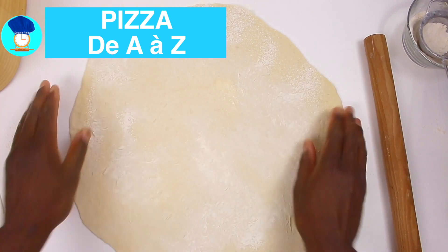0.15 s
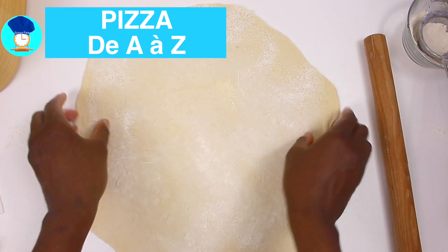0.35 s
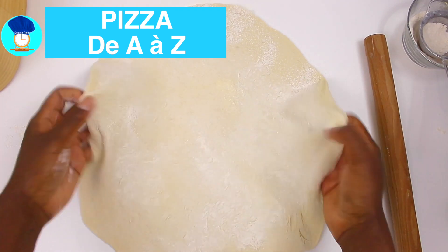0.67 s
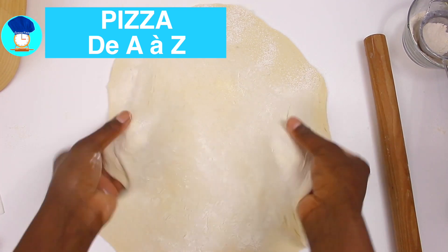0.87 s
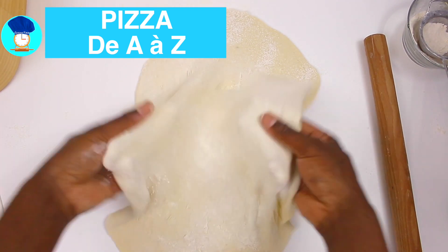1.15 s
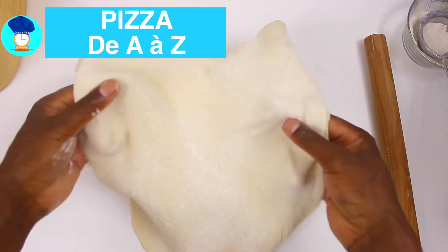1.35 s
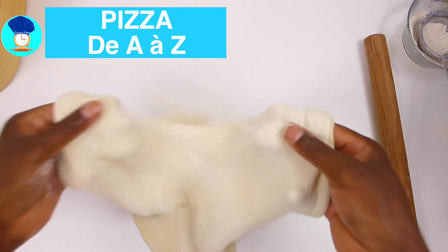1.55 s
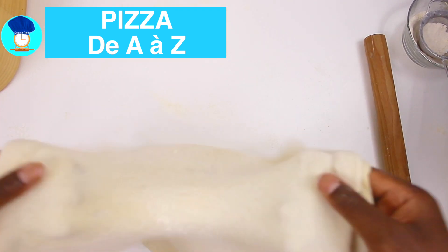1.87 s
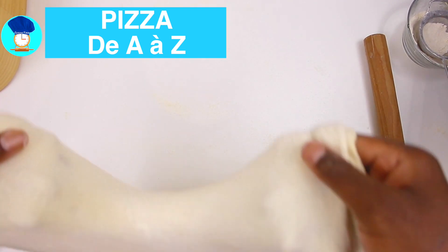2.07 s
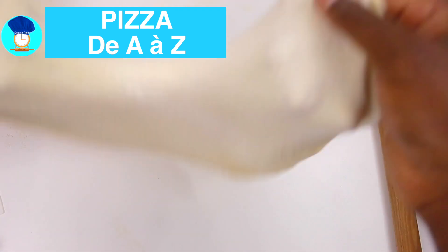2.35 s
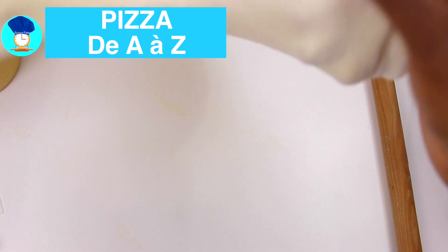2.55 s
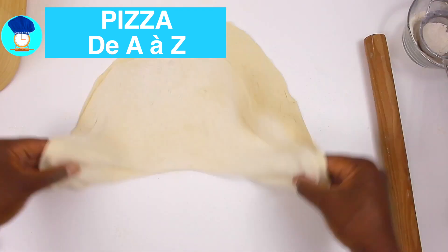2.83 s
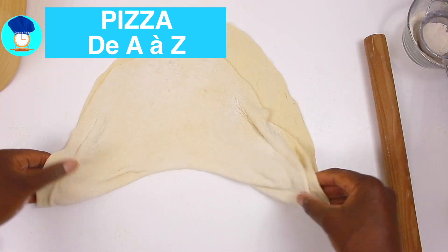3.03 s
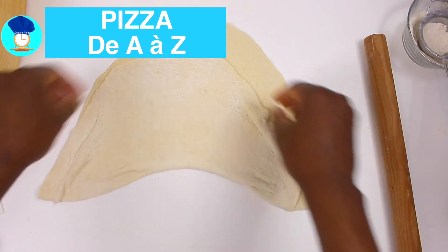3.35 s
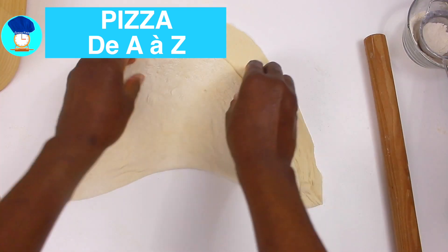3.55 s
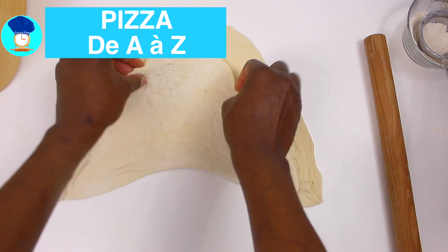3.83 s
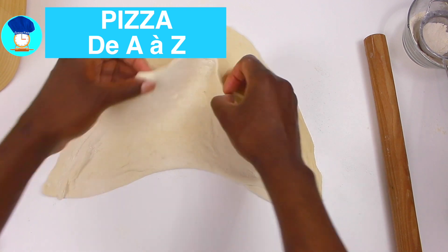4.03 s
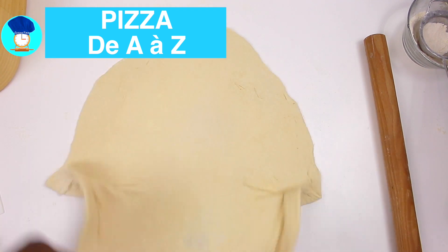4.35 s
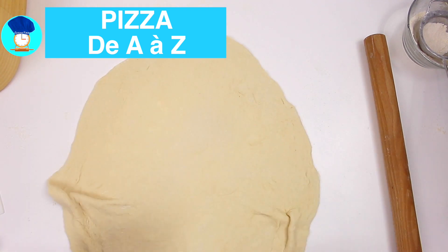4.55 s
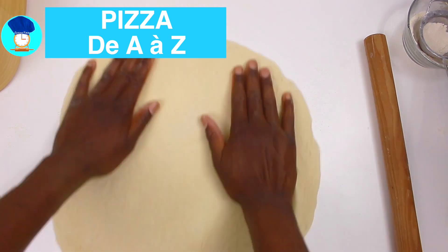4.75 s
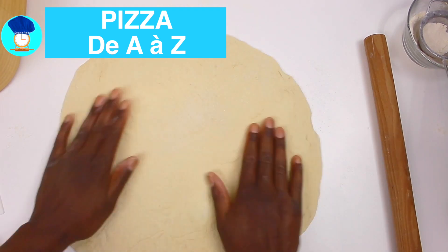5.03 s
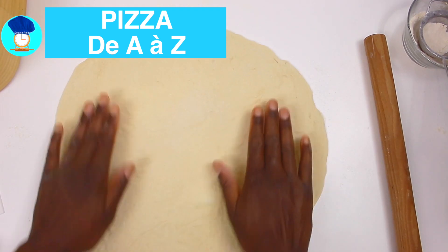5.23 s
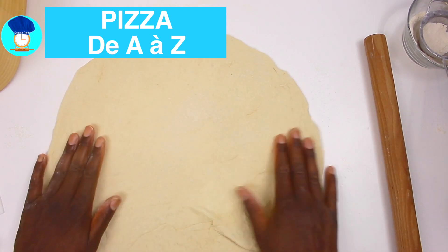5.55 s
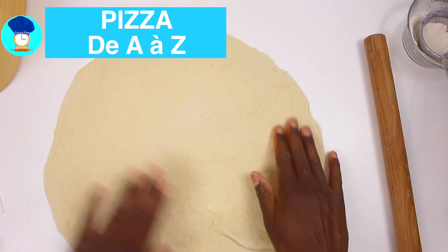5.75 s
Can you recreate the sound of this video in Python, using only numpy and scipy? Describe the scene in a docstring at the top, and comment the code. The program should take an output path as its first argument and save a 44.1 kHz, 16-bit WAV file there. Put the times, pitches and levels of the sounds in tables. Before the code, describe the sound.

Hands rustle and flop soft dough on a resonant worktop: dry flour hisses, one sharp slap midway, then dull palm pats.

```python
"""Hollow kitchen counter in a small hard room: a floured dough sheet is lifted, flopped down and patted.
Flour hiss and dough rustle are noise gated stroke by stroke, with ticks where dough sticks to skin.
Slaps are noise puffs through the worktop's modes; thumps and slow swells sound its low modes as sines.
Sticky pops and one small clink are short tones; a noise-tail echo and room tone surround them."""
import sys
import numpy as np
from scipy import signal
from scipy.fft import rfft, irfft, next_fast_len
from scipy.io import wavfile
from scipy.ndimage import map_coordinates

SR = 44100
rng = np.random.default_rng(int(sys.argv[2]) if len(sys.argv) > 2 else 0)


def wav_record(signal):
    """Record a signal, one row per channel, as 16-bit PCM in the file named by sys.argv[1]."""
    frames = np.transpose(np.atleast_2d(signal))
    bounded = np.clip(frames, -1, 1)
    # unit amplitude maps onto the largest positive 16-bit level
    quanta = np.round(bounded * 32767).astype(np.int16)
    wavfile.write(sys.argv[1], SR, quanta)


N = 259749


def amp(db):
    """Gain of a level in dB."""
    return 10 ** (np.asarray(db) / 20)


def unit(x):
    """Scaled to rms 1."""
    return x / np.sqrt(np.mean(x ** 2) + 1e-20)


def along(points, hz):
    """(frequency [Hz], value) points interpolated on a log axis."""
    f, v = np.transpose(points)
    return np.interp(np.log(hz + 1), np.log(f + 1), v)


def curves(rows):
    """One value per sample for each column after the time."""
    s, *cols = np.transpose(rows)
    return [np.interp(np.arange(N) / SR, s, c) for c in cols]


def wobble(rate_hz):
    """Smooth random curve, rate_hz knots a second."""
    knots = rng.standard_normal(int(N * rate_hz / SR) + 4)
    return map_coordinates(knots, [np.arange(N) * rate_hz / SR])


def filtered(x, response):
    """x through a complex response of frequency."""
    m = next_fast_len(x.shape[-1] + SR // 2)
    spectrum = rfft(x, m) * response(np.fft.rfftfreq(m, 1 / SR))
    return irfft(spectrum, m)[..., :x.shape[-1]]


def resonance(centre_hz, width_hz):
    """Causal band-pass response."""
    return lambda f: 1j * f * width_hz / (centre_hz ** 2 - f * f + 1j * f * width_hz)


def add(track, s, sound):
    """Mixes a sound in at time s."""
    part = track[round(s * SR):][:len(sound)]
    part += sound[:len(part)]


def paired(pair, alike, colour=lambda hz: 1):
    """Two unrelated signals mixed into a left and right of the given likeness."""
    def weights(hz):
        turn = np.arccos(np.clip(along(alike, hz), -1, 1)) / 2
        return colour(hz) * np.array([np.cos(turn), np.sin(turn)])
    mid, side = filtered(pair, weights)
    return np.array([mid + side, mid - side])


def rush(spectrum, alike, grain_db, grain_rate_hz, body=lambda hz: 1):
    """Coloured stereo noise of rms 1 with a randomly flickering level."""
    pair = rng.standard_normal((2, N)) * amp(grain_db * wobble(grain_rate_hz))
    return unit(paired(pair, alike, lambda hz: body(hz) * amp(along(spectrum, hz))))


def swell(s, rise_s, hold_s, sag_db_per_s, fade_db_per_s):
    """Gain that climbs 20 dB in the rise, sags through the hold, then fades."""
    t = np.arange(N) / SR - s
    climb_db = 20 * np.minimum(t, 0) / rise_s
    sag_db = sag_db_per_s * np.clip(t, 0, hold_s)
    fade_db = fade_db_per_s * np.maximum(t - hold_s, 0)
    return amp(climb_db - sag_db - fade_db)


# room tone spectrum: (frequency [Hz], relative level [dB])
AIR_SPECTRUM = [(13, -34), (22, -34), (59, -3), (115, -0.5), (160, -1), (236, -6), (286, -6.5), (387, -8.5),
                (496, -11), (792, -5), (935, -10), (1540, -17), (9480, -26), (14300, -31.5), (16000, -48)]
# room tone: (frequency [Hz], left-right correlation [-1..1])
AIR_LIKENESS = [(60, 1), (240, 0.29), (950, 0.095), (3770, 0.01), (15000, 0.036)]
AIR_DB = -51


def room_tone():
    """Air and microphone hiss: nearly steady coloured noise."""
    return amp(AIR_DB) * rush(AIR_SPECTRUM, AIR_LIKENESS, grain_db=0.14, grain_rate_hz=3.97)


# upper worktop modes: (frequency [Hz], width [Hz], level [dB])
WORKTOP_MODES = [(583, 59, 7.5), (653.5, 17, 7), (823, 54, 4.5), (957, 50, -3), (1217, 73, -6.5),
                 (1295, 29, 4.5), (1705, 25, -7), (2022, 70, -23.5), (2900, 1000, -1.5), (3650, 1700, -10)]


def worktop(f):
    """Response of the upper modes over a flat bed of unresolved ones."""
    return 1.7 + sum(amp(db) * resonance(hz, width_hz)(f) for hz, width_hz, db in WORKTOP_MODES)


def stickiness(per_second, spread_db, decay_cycles):
    """Bonds between dough and skin let go at random: damped ticks of scattered pitch and size."""
    draws = rng.random((int(per_second * N / SR), 3))
    hz = 500 * 7 ** draws[:, 1:2]
    t = np.arange(SR // 100) / SR
    tick_gain = amp(-spread_db * draws[:, 2:]) * np.exp(-hz * t / decay_cycles)
    ticks = tick_gain * np.sin(2 * np.pi * hz * t)
    where = (draws[:, :1] * N).astype(int) + np.arange(len(t))
    return unit(np.bincount(where.ravel(), ticks.ravel(), minlength=N)[:N])


# flour hiss spectrum: (frequency [Hz], relative level [dB])
FLOUR_SPECTRUM = [(350, -76), (600, -54), (652, -76), (812, -57), (1100, -9), (1490, -5.5), (2400, -6),
                  (3680, -7), (8740, -15), (16000, -28)]
# dough rustle spectrum before the worktop: (frequency [Hz], relative level [dB])
DOUGH_SPECTRUM = [(200, 1.5), (400, 4), (600, 0), (800, 3.5), (1300, 4), (2000, -2.5), (3500, -17),
                  (8000, -31)]
# sounds at the counter: (frequency [Hz], left-right correlation [-1..1])
NEAR_LIKENESS = [(60, .97), (500, 0.94), (1500, 0.76), (4000, 0.48), (12000, 0.15)]
# hand and dough strokes over flour:
# (loudest time [s], rise [s], slide [s], flour hiss level [dB], dough rustle level [dB])
STROKES = [(.05, 0.9, 0.015, -26, -42), (0.408, 0.062, .02, -44, -35), (0.569, 0.15, 0.017, -44.5, -38),
           (.72, 0.25, 0.0092, -46.5, -50.5), (.82, 0.13, 0.14, -49.5, -42),
           (0.969, 0.047, 0.019, -58, -35.5), (1.109, 0.21, 0.0073, -51, -36.5),
           (1.18, 0.077, 0.13, -49.5, -41), (1.35, .15, .06, -44.5, -51), (1.5, 0.025, 0.045, -46, -42.5),
           (1.6, 0.22, 0.064, -45, -47.5), (1.72, 0.12, .03, -40.5, -48.5), (1.93, 0.081, 0.045, -44, -48),
           (2.57, .04, 0.045, -55, -65), (2.75, 0.21, 0.098, -51, -56), (2.87, 0.04, .02, -40, -47),
           (2.916, 0.045, 0.055, -25.5, -20.5), (3.2, .1, .05, -54, -63), (3.46, 0.11, 0.046, -61, -54),
           (3.7, 0.086, 0.018, -53, -56), (3.87, 0.055, 0.017, -57, -64), (4.18, 0.21, 0.0081, -52.5, -57),
           (4.35, 0.11, 0.056, -69, -51), (4.5, 0.13, 0.048, -46.5, -65), (4.573, .08, 0.028, -43.5, -32.5),
           (4.833, 0.012, 0.15, -38, -49), (5.17, 0.045, 0.19, -40, -37.5), (5.424, 0.024, 0.021, -44, -36),
           (5.539, 0.078, 0.0043, -51.5, -45), (5.62, .06, 0.009, -49, -60),
           (5.68, 0.075, 0.0063, -52, -50), (5.88, 0.084, 0.018, -52.5, -56)]
# dough stirring between strokes: (time [s], flour hiss level [dB], dough rustle level [dB])
STIRRING = [(0, -69, -65), (.6, -52.5, -54.5), (1.85, -54.5, -52.5), (2.1, -58, -54.5), (2.25, -79, -61),
            (2.9, -66, -63.5), (3.0, -48, -31.5), (3.13, -48, -55), (3.33, -55.5, -53.5), (3.42, -71, -52),
            (3.8, -65, -60), (4.3, -67, -61.5), (5.1, -73, -57.5), (5.3, -56, -55), (5.89, -71, -57.5)]
SLIDE_SAG_DB_PER_S, HISS_FADE_DB_PER_S, RUSTLE_FADE_DB_PER_S = 79.5, 176, 174


def strokes():
    """Flour hisses under the skin; dough rustles lower and lumpier through the worktop, and ticks."""
    hiss_gain, rustle_gain = amp(curves(STIRRING))
    for s, rise_s, slide_s, hiss_db, rustle_db in STROKES:
        hiss_swell = swell(s, rise_s, slide_s, SLIDE_SAG_DB_PER_S, HISS_FADE_DB_PER_S)
        rustle_swell = swell(s, rise_s, slide_s, SLIDE_SAG_DB_PER_S, RUSTLE_FADE_DB_PER_S)
        hiss_gain = np.hypot(hiss_gain, amp(hiss_db) * hiss_swell)
        rustle_gain = np.hypot(rustle_gain, amp(rustle_db) * rustle_swell)
    hiss = rush(FLOUR_SPECTRUM, NEAR_LIKENESS, grain_db=0.5, grain_rate_hz=1600)
    rustle = rush(DOUGH_SPECTRUM, NEAR_LIKENESS, grain_db=1.5, grain_rate_hz=150, body=worktop)
    ticks = amp(-14) * stickiness(150, spread_db=17, decay_cycles=1.16)
    return hiss_gain * hiss + rustle_gain * (rustle + ticks)


def drone(hz, drift_hz, flutter_db):
    """One mode kept sounding by uneven pressure: a sine wandering in pitch and level, rms 1."""
    phase = 2 * np.pi * np.cumsum(hz + drift_hz * wobble(14)) / SR
    return unit(amp(flutter_db * wobble(25)) * np.sin(phase))


# lowest counter modes, sounding throughout: (frequency [Hz], level [dB])
MURMUR = [(52, -68.5), (112, -62.5)]
# low counter notes as weight shifts, without a blow:
# (loudest time [s], rise [s], hold [s], level [dB], mode frequency [Hz])
SWELLS = [(0.54, 0.11, 0.006, -47, 293.7), (0.873, 0.1, 0.044, -36.5, 287.3),
          (0.96, 0.21, 0.14, -41.5, 113.8), (1.373, 0.16, 0.015, -54, 112.7), (1.545, .1, 0.014, -51, 290),
          (1.732, 0.039, 0.022, -53, 295), (2.15, 0.75, 0.26, -50, 111.9),
          (2.941, 0.074, 0.015, -32.5, 290.7), (2.965, 0.16, 0.13, -44, 111.6),
          (3.07, 0.31, 0.28, -61, 51.7), (3.33, .3, .03, -53.5, 115), (3.597, 0.37, 0.15, -52, 52),
          (4.367, 0.075, .01, -47, 293), (4.57, 0.17, 0.027, -44, 110), (4.59, .1, .01, -43.5, 53.5),
          (4.662, .06, 0.019, -46, 288.7), (5.2, .1, 0.11, -49, 52), (5.255, .06, 0.1, -45, 291),
          (5.427, .1, 0.082, -47, 51.6), (5.512, .06, 0.031, -37.5, 288.8), (5.68, .1, .02, -44, 113.4),
          (5.68, .1, .02, -50, 52)]
SWELL_SAG_DB_PER_S, SWELL_FADE_DB_PER_S = 11, 150


def swells():
    """Uneven pressure keeps single low modes sounding."""
    out = sum(amp(db) * drone(hz, 4, 3.6) for hz, db in MURMUR)
    for s, rise_s, hold_s, db, hz in SWELLS:
        gain = amp(db) * swell(s, rise_s, hold_s, SWELL_SAG_DB_PER_S, SWELL_FADE_DB_PER_S)
        out = out + gain * drone(hz, 4, 2.2)
    return out


# dough slaps and finger taps:
# (time [s], puff peak [dB], centre frequency [Hz], t60 [s], crack drive re slap level [dB])
SLAPS = [(0.37, -34, 1000, 0.14, -19), (0.801, -32, 900, 0.052, -23), (0.861, -22, 570, 0.17, -33),
         (0.9443, -10, 1550, 0.031, -21), (0.947, -18, 820, 0.037, -40), (1.088, -31, 1920, 0.14, -34.5),
         (1.218, -27.5, 1960, 0.015, -30), (1.325, -34.5, 550, .1, -30), (1.49, -41, 554, 0.013, -17),
         (1.517, -32, 544, 0.0079, -25), (1.538, -24, 1240, 0.032, -10), (1.566, -23, 1450, 0.025, -30),
         (1.541, -32, 540, 0.05, -30), (1.577, -30, 580, 0.038, -3), (1.731, -17.5, 1620, 0.017, -5),
         (1.8, -34, 670, 0.029, -25), (1.891, -33.5, 1520, 0.044, -25), (1.938, -25, 1180, 0.038, -5.5),
         (2.855, -24, 760, 0.075, -20), (2.897, -16.5, 794, 0.044, -22), (2.93, -7, 2570, 0.056, -3),
         (2.9339, -3.5, 1820, 0.037, -0.5), (2.938, -6.5, 816, 0.08, -30), (2.956, -10, 950, 0.028, -25),
         (2.993, -15.5, 870, 0.038, -25), (4.171, -36, 2655, 0.04, -20), (4.317, -47, 1230, 0.097, -24),
         (4.334, -37.5, 820, 0.19, -30), (4.53, -32, 1050, .04, -27), (4.54, -18.5, 1220, 0.046, -9),
         (4.548, -12.5, 1200, 0.05, -16), (4.828, -31, 1720, 0.044, -20), (5.151, -22, 1240, 0.047, -9.5),
         (5.409, -23.5, 1350, 0.054, -10), (5.526, -29.5, 1840, 0.043, 0), (5.598, -35, 1000, 0.08, -26),
         (5.661, -29.5, 1150, 0.025, -21), (5.731, -39, 794, 0.084, -17), (5.859, -40, 1040, 0.056, -30)]
# band width over centre of a -25.5 dB slap; harder slaps are narrower, dB of width per dB of level
SLAP_WIDTH_RATIO, NARROWER_DB_PER_DB = 0.79, 0.2052


def slaps():
    """Air squeezed out under the dough rings the worktop around one band, with a bright crack."""
    out, t = np.zeros(N), np.arange(SR // 4) / SR
    for s, db, hz, t60, crack_db in SLAPS:
        noise = rng.standard_normal((2, len(t)))
        noise *= 1 - np.exp(-t / (0.032 * t60))  # longer slaps build up more slowly
        noise[0, 0] = 0.3 / t60  # shorter ones start with a stronger single push
        noise *= amp(-60 * t / t60)
        width_hz = SLAP_WIDTH_RATIO * amp(-NARROWER_DB_PER_DB * (db + 25.5)) * hz
        band = resonance(hz, width_hz)
        puff = filtered(noise[0], lambda f: worktop(f) * band(f) ** 2)
        crack = amp(crack_db) * filtered(noise[1], resonance(5300, 2260))
        add(out, s, amp(db) * (puff / np.abs(puff).max() + crack))
    return out


# low counter modes: (frequency [Hz], level [dB], free t60 [s])
COUNTER_MODES = [(130, -2.5, 0.21), (164.1, 0, 0.24), (182, 4.5, 0.092), (245.2, 4.5, 0.14),
                 (262.3, -18, 0.9), (326.8, 1, 0.2), (378, -2.5, 0.17), (421.6, 2, 0.083), (482, -15, 0.16),
                 (674, -30, 0.17)]
# soft blows of palms and dough: (time [s], level [dB], second mode offset [dB],
# upper modes offset [dB], ring time over free ring time [ratio])
THUMPS = [(0.494, -23, -21, -26, 1.4), (0.528, -32.5, -5, -12, 0.51), (0.797, -37, 6, 4, 0.84),
          (0.860, -3.5, -3, -8.5, 0.76), (1.724, -36, -11, -15, 0.99), (1.931, -38, -4, -5.5, 0.71),
          (2.898, -32, 5.5, -18, 1.2), (2.937, -14, -14, -15, 1.27), (3.57, -27, -7.5, -13, 0.68),
          (3.69, -35, -7, -12.5, 0.76), (4.334, -37, -9, -0.5, 1.5), (4.353, -32.5, 5, 4, 0.42),
          (4.372, -28.5, -7, -8, 0.62), (4.394, -30, -0.5, -7.5, 0.71), (4.555, -22.5, -4.5, -13, 0.88),
          (4.831, -35.5, -10.5, -36, 1.36), (5.143, -15, 1, -23, 0.45), (5.154, -22, -4, -11.5, 0.47),
          (5.408, -7.5, 0.5, -25, 0.57), (5.433, -17.5, -15, -10, 1.01), (5.601, -17.5, -9, -32, 0.76),
          (5.659, -22.5, -4.5, -24, 0.75), (5.853, -22.5, -18, -31, 1.3)]
# build-up time of a -29.5 dB blow; it lengthens by this many dB per dB of blow level
CONTACT_S, LONGER_DB_PER_DB = 0.0058, 0.07


def thumps():
    """Each blow rings the same modes; landing spot sets their balance, a resting palm the ring time."""
    out, t = np.zeros(N), np.arange(SR // 2) / SR
    for s, db, second_db, upper_db, share in THUMPS:
        spot_db = [0, second_db] + [upper_db] * (len(COUNTER_MODES) - 2)
        ring = np.zeros(len(t))
        for (hz, level_db, t60), offset_db in zip(COUNTER_MODES, spot_db):
            mode_db = level_db + offset_db + rng.normal(0, 1.05)
            ring += amp(mode_db - 60 * t / (share * t60)) * np.sin(2 * np.pi * hz * t)
        contact_s = CONTACT_S * amp(LONGER_DB_PER_DB * (db + 29.5))
        push = 1 - np.exp(-t / contact_s)  # soft contact
        add(out, s, -amp(db) * ring * push)
    return filtered(out, lambda f: (1j * f / (55 + 1j * f)) ** 2)  # the slab radiates little lower down


# sticky dough letting go: (time [s], level [dB], pitch [Hz], length [s])
POPS = [(1.217, -22, 594, 0.011), (1.279, -30.5, 590, 0.0087)]


def pops():
    """Each pop is one brief tone under a bell-shaped envelope."""
    out = np.zeros(N)
    for s, db, hz, length_s in POPS:
        t = np.arange(int(3 * length_s * SR)) / SR
        bell = np.exp(-(2.5 * (t / length_s - .5)) ** 2)
        add(out, s, amp(db) * np.sin(2 * np.pi * hz * t) * bell)
    return out


# modes of something small and hollow: (frequency [Hz], level [dB], t60 [s])
CLINK_MODES = [(1255, 7, 0.16), (1352, 2.5, 0.32), (1410, 3, 0.22), (2150, -15, .3), (3100, -19, 0.31)]
CLINK_S, CLINK_DB = 2.039, -42.5


def clink():
    """A nudged small hollow thing: close modes beat, and their level chatters as they die."""
    out, t = np.zeros(N), np.arange(SR // 2) / SR
    ring = sum(amp(db - 60 * t / t60) * np.sin(2 * np.pi * hz * t) for hz, db, t60 in CLINK_MODES)
    add(out, CLINK_S, amp(CLINK_DB) * ring * (1 - np.exp(-t / 0.0026)))
    return out * amp(3.2 * wobble(120))


# room decay: (frequency [Hz], t60 [s])
KITCHEN_DECAY = [(150, 0.33), (1000, 0.1), (4000, 0.32), (12000, 0.06)]


def kitchen(x):
    """Echo whose frequencies each die at their own speed; a fresh noise tail per quarter second."""
    out, step, lag = np.zeros((2, N + SR)), SR // 4, SR // 300
    for start in range(0, N, step):
        hz, t, z = signal.stft(rng.standard_normal((2, SR // 2)), SR, nperseg=256)
        decay = amp(-60 * t / along(KITCHEN_DECAY, hz)[:, None])
        noise = signal.istft(z * decay, SR, nperseg=256)[1]
        tail = paired(noise, NEAR_LIKENESS)
        tail = tail / np.linalg.norm(tail[0])
        wet = signal.fftconvolve(x[None, start:start + step], tail, axes=1)
        out[:, start + lag:start + lag + wet.shape[1]] += wet
    return out[:, :N]


def scene():
    """Everything on the counter, its echo and the room tone."""
    hits, wood, near = slaps() + clink(), thumps() + swells(), pops()
    echo = kitchen(amp(-6.0) * hits + amp(-8.5) * wood + amp(-9) * near)
    return wood + hits + near + echo + strokes() + room_tone()


# port balance: (frequency [Hz], left over right level [dB])
LEFT_OVER_RIGHT = [(60, -3.5), (240, -3.5), (950, -1.0), (3770, -0.5), (15000, 0)]
CEILING, TOP_HZ = .95, 15750


def record(dry):
    """The right port hears more bass; peaks saturate softly; nothing is kept above TOP_HZ."""
    ports = filtered(dry, lambda hz: amp(np.outer([.5, -.5], along(LEFT_OVER_RIGHT, hz))))
    soft = ports / (1 + np.abs(ports / CEILING) ** 6) ** (1 / 6)
    return filtered(soft, lambda hz: hz < TOP_HZ)


dry = scene()
out = record(dry)
wav_record(out)
```